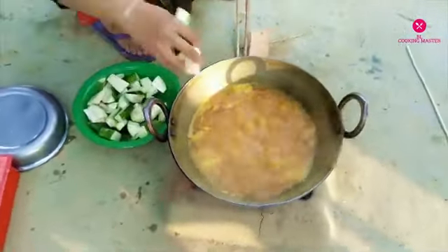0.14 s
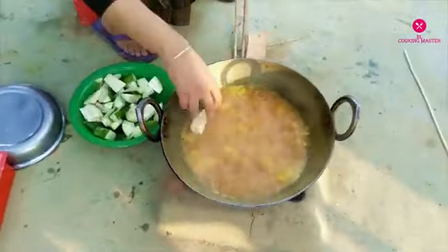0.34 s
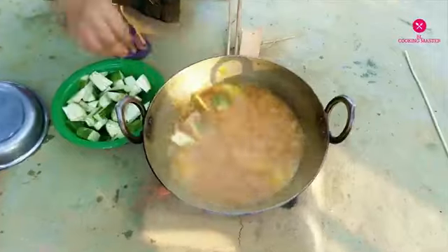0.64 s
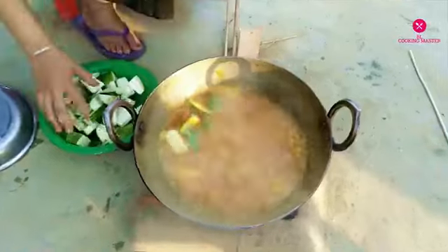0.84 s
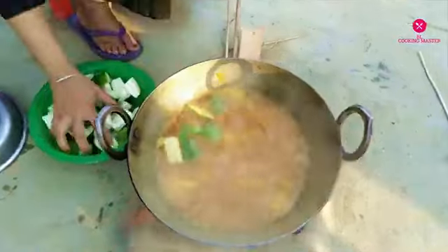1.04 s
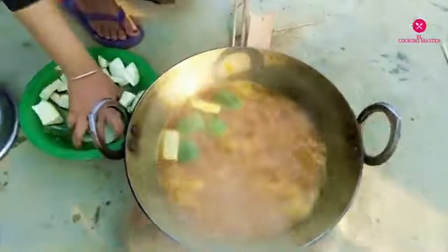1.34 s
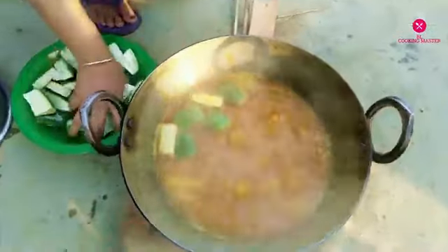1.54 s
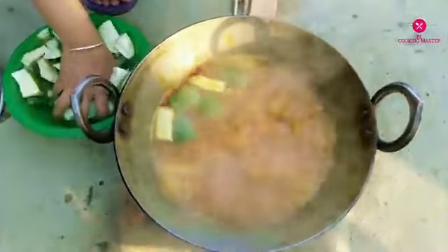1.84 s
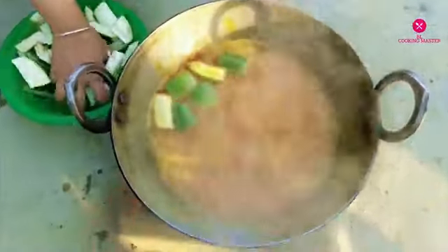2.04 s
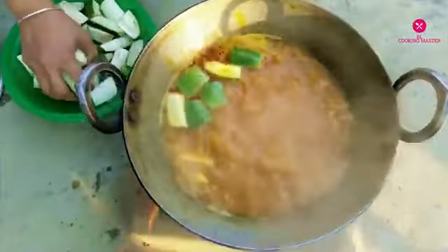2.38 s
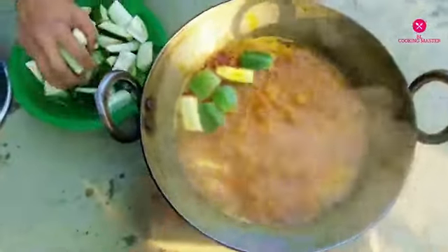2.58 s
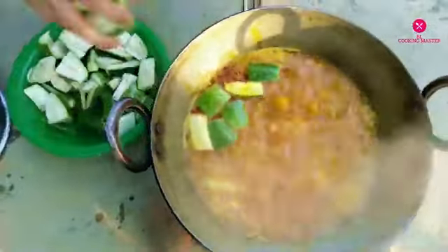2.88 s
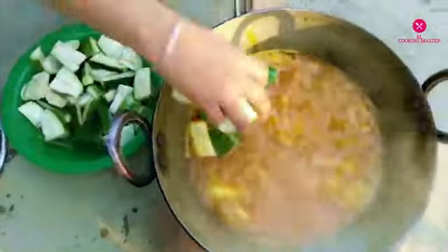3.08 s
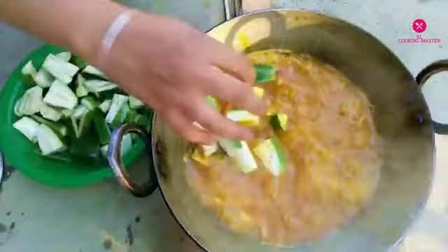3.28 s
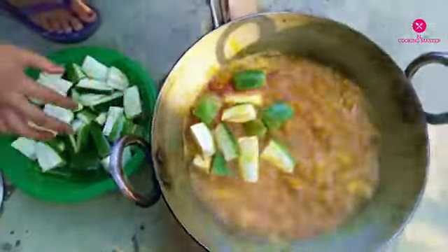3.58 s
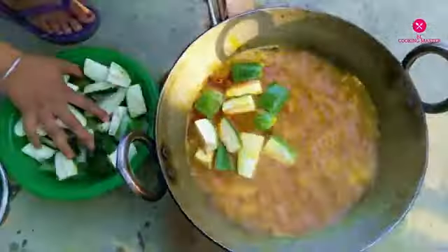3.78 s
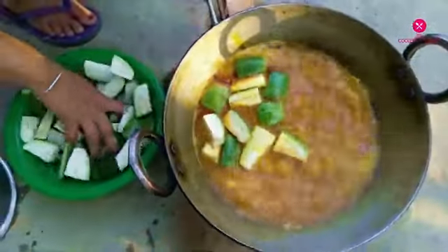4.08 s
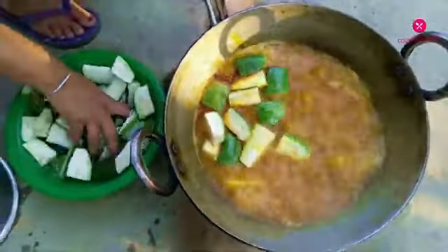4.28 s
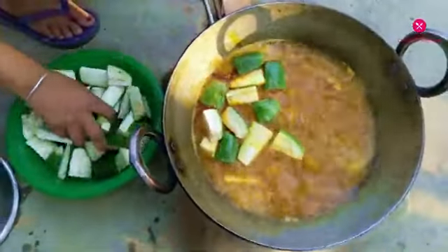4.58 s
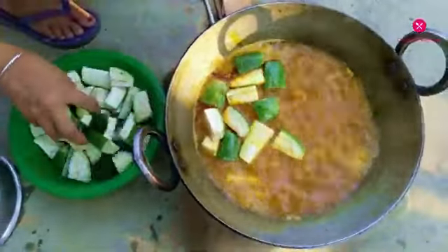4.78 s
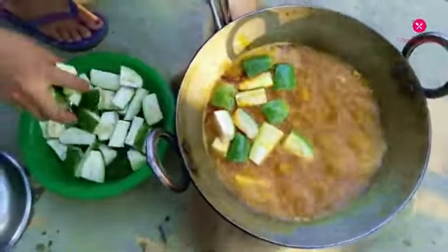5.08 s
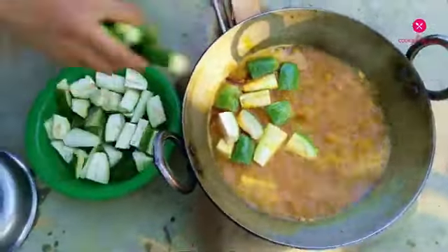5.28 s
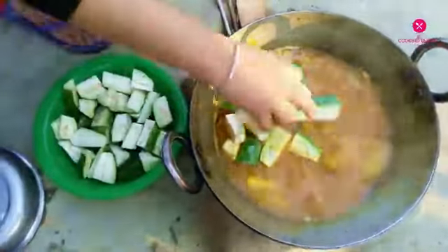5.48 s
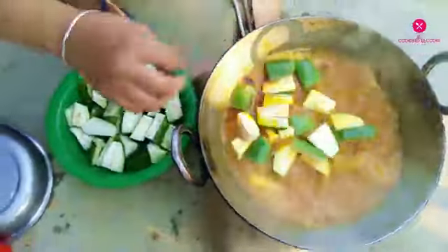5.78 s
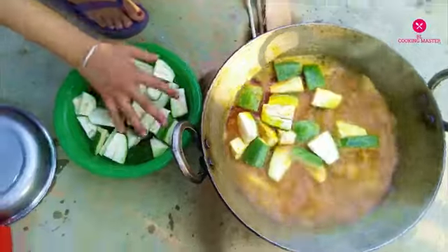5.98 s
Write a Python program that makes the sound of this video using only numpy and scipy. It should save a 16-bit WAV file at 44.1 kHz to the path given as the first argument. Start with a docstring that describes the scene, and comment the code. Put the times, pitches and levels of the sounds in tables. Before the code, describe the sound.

Thick gravy simmers in a metal wok outdoors for about six seconds, a hollow, uneven bubbling with rounded plops and short ticks of spitting fat. At 0.4 seconds a piece of vegetable drops in with a light wet tap. Around 0.7 seconds a bird gives one thin, high whistle. At 3.2 seconds a handful of chunks lands in a quick cluster of wet slaps, followed by a fine fizzing hiss that fades by about 4.2 seconds. Another piece hits near 5.4 seconds, then a second handful lands around 5.6 seconds with the loudest, sharpest slaps and a brief sizzle. Throughout, a distant bird repeats a soft four-note trill a little more than once a second over a faint traffic drone. Faint high hiss flickers and thin tones come and go. The microphone is small and slightly muffled.

```python
"""Thick gravy bubbling in a metal wok, with wet slaps and hiss as handfuls of vegetable drop in.
Bursting bubbles ring the air in the bowl, fat spits in short ticks, splashes fizz with fine droplets.
Around the yard a far bird repeats a four-note trill, another whistles and distant traffic drones.
Narrow high bands of hiss flicker and thin tones come and go. A small muffled microphone hears it all."""
import sys
import numpy as np
from scipy import signal
from scipy.io import wavfile
from scipy.ndimage import uniform_filter1d, map_coordinates

SR = 44100
rng = np.random.default_rng(int(sys.argv[2]) if len(sys.argv) > 2 else 0)


def transcribe(u):
    """Save the signal u as a 16-bit wav file named by the first command-line argument.

    u: samples, shape (n,) or (channels, n), limited to [-1, 1]; the rate is SR.
    q: integer samples, one column per channel.
    """
    v = np.clip(np.atleast_2d(u).T, -1, 1)
    q = np.round(v * 32767).astype(np.int16)
    wavfile.write(sys.argv[1], SR, q)


N = 270333
BAND_LIMIT_HZ = 8650


def gain_of(db):
    """Decibels to amplitude."""
    return 10 ** (np.asarray(db) / 20)


def unit_rms(x):
    """Scales to rms 1."""
    return x / np.sqrt(np.mean(x ** 2) + 1e-20)


def curve(rows, t):
    """Table columns interpolated at times t."""
    times_s, *columns = np.transpose(rows)
    return [np.interp(t, times_s, column) for column in columns]


def add(mix, start_s, sound):
    """Mixes a sound in at start_s."""
    part = mix[round(start_s * SR):][:len(sound)]
    part += sound[:len(part)]


def ring(x, hz, width_hz):
    """Fixed resonance, gain 1."""
    radius = np.exp(-np.pi * width_hz / SR)
    pole = radius * np.exp(2j * np.pi * hz / SR)
    return 2 * signal.lfilter([1 - radius], [1, -pole], x).real


def gliding_ring(x, hz, width_hz):
    """Moving resonance, gain 1: shift the curve hz to zero, smooth, shift back."""
    carrier = np.exp(2j * np.pi * np.cumsum(hz) / SR)
    radius = np.exp(-np.pi * width_hz / SR)
    return 2 * (carrier * signal.lfilter([1 - radius], [1, -radius], x / carrier + 1e-18)).real


def wander(rate_hz):
    """Smooth random curve, rms near 1."""
    return map_coordinates(rng.standard_normal(200), [np.arange(N) / SR * rate_hz], order=3)


def blur(grid, rows, columns):
    """2-D moving average."""
    return uniform_filter1d(uniform_filter1d(grid, rows, axis=0), columns, axis=1)


def patchy_noise(spectrum, patch_db, fft_size):
    """Shaped noise with drifting spectral patches, rms 1."""
    hz = np.fft.rfftfreq(fft_size, 1 / SR)
    real, imag, patches = rng.standard_normal((4 * N // fft_size + 5, len(hz), 3)).T
    knots_hz, knots_db = np.transpose(spectrum)
    shape_db = np.interp(np.log(hz + 1), np.log(knots_hz + 1), knots_db, left=-120, right=-120)
    spectra = (real + 1j * imag) * gain_of(shape_db[:, None] + patch_db * unit_rms(blur(patches, 6, 6)))
    return unit_rms(signal.istft(spectra, nperseg=fft_size, noverlap=3 * fft_size // 4)[1][:N])


def yard_echo(x, t60_s, delay_s):
    """Diffuse echoes from walls and trees, energy 1."""
    t = np.arange(SR // 2) / SR
    tail = rng.standard_normal(len(t)) * gain_of(-60 * t / t60_s) * (t > delay_s)
    return signal.fftconvolve(x, tail / np.linalg.norm(tail))[:N]


def bubble(hz, cycles, glide):
    """Pitch rises as the bubble opens; amplitude peaks near 1 after `cycles` periods."""
    age = np.arange(round(5 * cycles / hz * SR)) / SR * hz / cycles
    return np.sin(2 * np.pi * cycles * (age + glide * age ** 2)) * (age * np.exp(1 - age)) ** 2


# Hiss spectrum: f/Hz, relative density/dB
AIR_SPECTRUM = [(530, -33), (900, -12.5), (1150, 3), (1590, -5), (4970, -2.5), (7610, -1), (8600, -13),
                (11200, -61), (18900, -120)]

def air():
    """Steady outdoor hiss."""
    return gain_of(-70) * patchy_noise(AIR_SPECTRUM, patch_db=1.5, fft_size=1024)


# Rumble spectrum: f/Hz, relative density/dB
ROAD_SPECTRUM = [(15, -41), (25, -12.5), (32, -21.5), (55, 2), (75, 6.5), (108, 3.5), (219, -7.5),
                 (344, -49), (400, -27), (520, -45), (880, -120)]
# Rumble envelope: t/s, level/dB
ROAD_LEVEL = [(0.0, -56.5), (0.46, -59.5), (2.0, -56), (3.31, -53.5), (3.57, -56.5), (5.38, -57.5),
              (6.13, -58.5)]
# Engine notes: t/s, length/s, f/Hz, level/dB
ENGINE_NOTES = [(2.492, 0.8, 70, -54.5), (3.85, 1, 80, -54.5)]

def traffic(t):
    """Lumpy road rumble; wavering engine notes swell out of it."""
    out = gain_of(curve(ROAD_LEVEL, t)[0]) * patchy_noise(ROAD_SPECTRUM, patch_db=2.15, fft_size=2048)
    drift_cycles = 2.5 * np.cumsum(wander(12)) / SR
    waver = gain_of(wander(7.2))
    for start_s, length_s, hz, db in ENGINE_NOTES:
        swell = np.clip(np.minimum(t - start_s, start_s + length_s - t) / .09, 0, 1)
        out += gain_of(db) * swell * waver * np.sqrt(2) * np.sin(2 * np.pi * (hz * t + drift_cycles))
    return out


# Hiss bands: f/Hz, stage width/Hz, level/dB
HIGH_HISS_BANDS = [(7000, 110, -79), (7736, 93, -71)]

def high_hiss():
    """Narrow high bands of hiss, flickering in level."""
    out = np.zeros(N)
    for hz, width_hz, db in HIGH_HISS_BANDS:
        band = ring(ring(rng.standard_normal(N), hz, width_hz), hz, width_hz)
        out += unit_rms(band) * gain_of(db + 3.7 * np.tanh(2 * wander(21)))
    return out


# Fuzzy tones: t/s, length/s, start f/Hz, end f/Hz, level/dB
THIN_TONES = [(0.101, .25, 7110, 7390, -62), (0.167, 0.14, 2347, 2250, -65), (0.497, .17, 660, 636, -57),
              (0.727, 0.1, 1049, 1033, -61), (.74, 0.16, 6770, 6710, -58), (5.115, 0.34, 4120, 3930, -64.5),
              (5.13, .11, 4920, 4750, -68.5), (5.125, .08, 3230, 3115, -68.5),
              (5.178, .14, 1593, 1645, -62), (5.262, .32, 2336, 2418, -59), (5.304, 0.138, 4920, 4950, -69),
              (5.815, 0.093, 3245, 3300, -63.5), (5.84, 0.12, 7000, 6980, -61)]

def thin_tones(width_hz=90):
    """Gliding noise bands that swell, flutter and fade."""
    out = np.zeros(N)
    for start_s, length_s, start_hz, end_hz, db in THIN_TONES:
        hz = np.linspace(start_hz, end_hz, round(length_s * SR))
        hiss = rng.standard_normal(len(hz))
        tone = gliding_ring(gliding_ring(hiss, hz, width_hz), hz, width_hz)
        add(out, start_s, gain_of(db) * unit_rms(tone) * signal.windows.tukey(len(hz), .4))
    return out * gain_of(3 * wander(28))


# Whistle envelope: t/s, level/dB
WHISTLE_LEVEL = [(.6, -85), (.638, -38.5), (.652, -52), (.68, -28), (.72, -46), (.745, -42), (.79, -42.5),
                 (.835, -63), (1.02, -71)]

def bird_whistle(t, hz=6347):
    """One thin note, pulsing in strength."""
    gate = (t > WHISTLE_LEVEL[0][0]) * (t < WHISTLE_LEVEL[-1][0])
    level_db = curve(WHISTLE_LEVEL, t)[0] + 2.5 * wander(23)
    return gate * gain_of(level_db) * np.sin(2 * np.pi * hz * t)


# Trills: t/s, first-note level/dB
TRILL_CALLS = [(.005, -44), (.869, -46), (1.739, -44), (2.601, -44), (3.473, -44), (4.333, -44.5),
               (5.183, -45.5), (6.031, -47.5)]

def bird_trills(top_hz=1247, step_hz=35, step_db=1, spacing_s=.05, slowing_s=.005):
    """Four pure notes, each sliding down and levelling out higher than the last; the yard smears them."""
    out, t = np.zeros(N), np.arange(round(.033 * SR)) / SR
    for start_s, db in TRILL_CALLS:
        for k, jitter_db in enumerate(2.9 * rng.standard_normal(4)):
            end_hz = 866 + k * step_hz
            hz = end_hz + (top_hz - end_hz) * np.exp(-(t / .01468) ** 2.63)
            note = np.sin(2 * np.pi * np.cumsum(hz) / SR) * signal.windows.tukey(len(t), .6)
            onset_s = start_s + .004 + k * (spacing_s + k * slowing_s)
            add(out, onset_s, gain_of(db + k * step_db + jitter_db) * note)
    return out + gain_of(1.5) * yard_echo(out, t60_s=.26, delay_s=.01)


# Loudest fat drops: t/s, level/dB, f/Hz
FAT_DROPS = [(.25, -53.5, 2790), (.254, -56, 4760), (.345, -51.5, 1507), (.382, -51.5, 6000),
             (.384, -55.5, 5150), (.398, -45, 1606), (.398, -48.5, 6920), (.398, -61, 2450),
             (.4, -65, 3970), (.435, -68, 2620), (1.368, -58, 4730), (1.455, -58, 7450), (1.51, -55, 4260),
             (1.55, -59, 1343), (1.585, -50.5, 1555), (1.872, -60.5, 4410), (2.0, -60, 3870),
             (2.0, -48.5, 1514), (2.056, -55.5, 1544), (2.068, -54.5, 2983), (2.083, -55.5, 7590),
             (2.277, -51, 5750), (2.306, -56, 3540), (2.309, -58.5, 1720), (2.464, -55.5, 1740),
             (2.576, -53, 1730), (2.65, -47.5, 1643), (2.696, -53, 4350), (2.722, -52.5, 7430),
             (2.858, -53, 5620), (2.929, -52.5, 4130), (2.929, -53, 5610), (2.954, -55, 1710),
             (3.027, -56, 7430), (3.533, -57.5, 3150), (3.584, -58.5, 2300), (3.683, -59, 2400),
             (3.837, -53.5, 4070), (3.94, -53.5, 1355), (4.038, -63, 2400), (4.13, -56, 1230),
             (4.21, -56.5, 1345), (4.354, -52.5, 3140), (4.375, -51, 2780), (4.433, -52, 6780),
             (4.51, -56.5, 2280), (4.565, -54.5, 1435), (4.667, -58, 6380), (4.875, -53, 1230),
             (5.005, -53.5, 1385), (5.08, -53, 1466), (5.456, -58, 6250), (6.064, -57, 5720)]

def fat_spits(small_count=300):
    """Each drop is a pitched tick with a hissing tail; small ones fall at random."""
    out, t = np.zeros(N), np.arange(SR // 6) / SR
    when, softness, pitch = rng.random((small_count, 3)).T
    small_drops = np.transpose([when * N / SR, -66.5 - 7 * softness, 1000 * 7.5 ** pitch ** 2.066])
    envelope = (gain_of(-60 * t / .055) + gain_of(-6 - 60 * t / .21)) * np.minimum(t / .0013, 1)
    for start_s, db, hz in np.vstack([FAT_DROPS, small_drops]):
        tick = rng.standard_normal(len(t))
        for _ in range(3):
            tick = ring(tick, hz, width_hz=.11 * hz)
        add(out, start_s - .001, gain_of(db) * unit_rms(tick) * envelope)
    return out


# Splashes: t/s, swell/s, fade/s, peak level/dB, peak f/Hz, end f/Hz, width/octaves
SPLASHES = [(.12, .07, 0.18, -62.5, 6660, 6420, 0.34), (.375, .02, 0.086, -64, 3500, 2420, 1),
            (3.142, .05, .26, -49.5, 5720, 7030, 0.23), (3.152, 0.055, 0.17, -51.5, 2280, 1750, 0.7),
            (3.45, .16, .29, -47.5, 6260, 6340, 0.23), (3.91, .045, 0.11, -51.5, 5730, 5480, .25),
            (4.079, 0.021, 0.091, -55, 5830, 6070, .25), (5.345, 0.0092, 0.15, -60.5, 3350, 3390, 0.33),
            (5.35, 0.0055, 0.079, -55, 6730, 6500, 0.11), (5.535, 0.0059, 0.054, -48, 6990, 6500, 0.15),
            (5.569, 0.049, 0.13, -49.5, 4230, 4500, 0.69), (5.799, .11, 0.071, -59.5, 6600, 6980, 0.25)]

def sizzle():
    """Dense fizz of fine droplets; each burst swells, then fades as its band drifts."""
    hiss = rng.standard_normal(N)
    droplets = gain_of(2.8 * np.minimum(rng.exponential(1, N), 3)) * (rng.random(N) < .02)
    fizz = hiss * (.15 + droplets)
    hz, t, spectra = signal.stft(fizz, SR, nperseg=512)
    patches = gain_of(4.4 * unit_rms(blur(rng.standard_normal(spectra.shape), 3, 9)))
    gain = np.zeros(spectra.shape)
    for start_s, swell_s, fade_s, db, peak_hz, end_hz, octaves in SPLASHES:
        peak_s = start_s + swell_s
        end_s = peak_s + fade_s
        knots = [(start_s, -14, peak_hz), (peak_s, 0, peak_hz), (end_s, -17, end_hz)]
        envelope_db, centre_hz = curve(knots, t)
        offset_octaves = np.log2((hz[:, None] + 1) / centre_hz)
        band = np.exp(-.5 * (offset_octaves / octaves) ** 2) * (hz[:, None] < BAND_LIMIT_HZ)
        band /= np.sqrt((band ** 2).mean(0))
        gain += band * gain_of(db + envelope_db) * (t > start_s) * (t < end_s)
    return signal.istft(spectra * gain * patches, SR, nperseg=512)[1][:N] / fizz.std()


# Chunk impacts: t/s, level/dB, f/Hz, tone-to-crack blend/0-1
CHUNK_IMPACTS = [(0.399, -36.5, 2600, .8), (3.19, -25.5, 3500, .7), (3.1977, -23, 4000, .7),
                 (3.208, -33, 5000, .8), (3.217, -23, 1100, .2), (3.2368, -20.5, 6400, .6),
                 (3.2892, -27.5, 4000, .6), (5.356, -29.5, 2300, .7), (5.541, -32.5, 6900, .5),
                 (5.579, -27.5, 2500, .6), (5.585, -24.5, 4150, .2), (5.586, -17.5, 6300, 0.25),
                 (5.5896, -13.5, 6700, .55), (5.6148, -9, 3700, .2), (5.618, -23, 3730, .1),
                 (5.6247, -25, 3950, .3)]

def wet_slaps(rise_s=.00079):
    """Chunks hit gravy and metal: a tiny trapped bubble rings over a broad crack and its spray."""
    out, t = np.zeros(N), np.arange(SR // 10) / SR
    age = t / rise_s
    pulse = age * np.exp(1 - age)
    spray = gain_of(-6 - 60 * t / .086) * np.minimum(age, 1)
    for start_s, db, hz, blend in CHUNK_IMPACTS:
        tone = np.sin(2 * np.pi * hz * t) * pulse ** 2
        hiss = ring(ring(rng.standard_normal(len(t)), 3400, 6200), 4000, 4700)
        crack = unit_rms(hiss) * (pulse + spray)
        add(out, start_s, gain_of(db) * ((1 - blend) * tone + .26 * blend * crack))
    return out


# Air modes of the bowl: f/Hz, nominal width/Hz, relative level/dB
BOWL_MODES = [(496.6, 67, 2.5), (592, 120, 1.5), (666, 64, 2.5), (826, 91, -5), (1198, 530, -16),
              (230, 180, -16.5)]
# Bubbling envelope: t/s, level/dB
SIMMER_LEVEL = [(0, -52.5), (.44, -45.5), (.52, -64), (.86, -52.5), (1.0, -47.5), (1.11, -67.5),
                (1.18, -47.5), (2.8, -46), (2.86, -52), (3.02, -43), (3.87, -49.5), (4.54, -45),
                (4.8, -62.5), (4.86, -53.5), (5.51, -50.5), (5.58, -44), (6.1, -78)]

def simmer(t, bursts_per_s=520):
    """Many small bursts knock the air in the bowl, which rings at its modes."""
    strength = gain_of(3.73 * np.minimum(rng.exponential(1, N), 4))
    knocks = strength * (rng.random(N) < bursts_per_s / SR)
    mode_hit = rng.integers(0, len(BOWL_MODES), N)
    bowl = np.zeros(N)
    for k, (hz, width_hz, db) in enumerate(BOWL_MODES):
        struck = (mode_hit == k) | ((hz < 300) & (mode_hit < 2))  # deepest mode joins the low bursts
        bursts = signal.oaconvolve(knocks * struck, bubble(hz, cycles=1, glide=.014))[:N]
        bowl += gain_of(db) * unit_rms(ring(ring(bursts, hz, 2.2 * width_hz), hz, 1.6 * width_hz))
    bowl = unit_rms(bowl + gain_of(-10.5) * yard_echo(bowl, t60_s=.45, delay_s=.004))
    levelled = bowl / np.sqrt(uniform_filter1d(bowl ** 2, size=8000) + .27)
    return gain_of(curve(SIMMER_LEVEL, t)[0]) * levelled


# Large bubbles and gulps: t/s, peak level/dB, f/Hz
LARGE_BUBBLES = [(.077, -43.5, 172), (.313, -30.5, 810), (.389, -41, 560), (.733, -42, 985),
                 (.796, -51, 288), (.735, -43, 595), (.805, -39, 640), (1.246, -48, 207),
                 (1.248, -36.5, 684), (1.287, -44, 734), (1.353, -46.5, 1164), (1.374, -35, 659),
                 (1.408, -35.5, 730), (1.417, -41, 571), (1.494, -41, 570), (1.635, -43, 990),
                 (1.729, -46, 192), (2.053, -32.5, 689), (2.09, -49, 143), (2.21, -33.5, 777),
                 (2.458, -32.5, 622), (2.521, -42, 214), (2.65, -33.5, 630), (2.816, -49, 290),
                 (3.077, -43, 654), (3.19, -38, 212), (3.227, -39.5, 173), (3.236, -31, 751),
                 (3.303, -38, 614), (3.423, -33, 708), (3.451, -45.5, 685), (3.508, -33, 568),
                 (3.537, -33.5, 649), (3.549, -43.5, 305), (3.645, -39, 482), (3.927, -45.5, 195),
                 (3.928, -32.5, 678), (4.039, -37.5, 552), (4.104, -36.5, 587), (4.324, -36, 635),
                 (4.382, -48.5, 630), (4.473, -41.5, 640), (4.843, -42, 622), (4.944, -38, 560),
                 (5.037, -38, 646), (5.08, -37, 708), (5.273, -48, 174), (5.277, -36, 614),
                 (5.517, -36, 697), (5.577, -41, 700), (5.594, -30.5, 664), (5.701, -38, 624),
                 (5.967, -43.5, 207)]

def plops(gulp_count=40, gulp_hz=(140, 325)):
    """Large bubbles burst and sinking chunks gulp; smaller gulps come at random."""
    out = np.zeros(N)
    when, softness, pitch = rng.random((gulp_count, 3)).T
    gulps = np.transpose([when * N / SR, -61.5 - 17 * softness, np.interp(pitch, (0, 1), gulp_hz)])
    for time_s, db, hz in np.vstack([LARGE_BUBBLES, gulps]):
        add(out, time_s - .62 / hz, gain_of(db) * bubble(hz, cycles=1.46, glide=.02))
    return out + gain_of(-4) * yard_echo(out, t60_s=.18, delay_s=.0024)


def scene():
    """Yard and wok at the microphone, mono."""
    t = np.arange(N) / SR
    background = air() + traffic(t) + high_hiss() + thin_tones() + bird_whistle(t) + bird_trills()
    wok = fat_spits() + sizzle() + wet_slaps() + simmer(t) + plops()
    return (background + wok)[None]


def record(dry):
    """A suppressor lowers whatever stays near the noise floor; then band limit and electronic hiss."""
    hz, _, spectra = signal.stft(dry[0], SR, nperseg=512, noverlap=384)
    power = blur(abs(spectra) ** 2, 5, 8) + 1e-20
    floor = np.percentile(power, q=20, axis=1, keepdims=True)
    gain = np.clip(1 - gain_of(-4.5) * floor / power, gain_of(-5.5), 1)
    gain[:4] = 1  # bass passes untouched
    gain *= gain_of(-5 * np.clip((hz[:, None] - 8000) / 500, 0, 1))  # microphone treble roll-off
    suppressed = signal.istft(spectra * gain, SR, nperseg=512, noverlap=384)[1][None, :N]
    lowpass = signal.firwin(401, BAND_LIMIT_HZ, window=("kaiser", 9), fs=SR)
    muffled = signal.oaconvolve(suppressed, lowpass[None], "same")
    return muffled + gain_of(-99) * rng.standard_normal(dry.shape)


dry = scene()
out = record(dry)
transcribe(out)
```